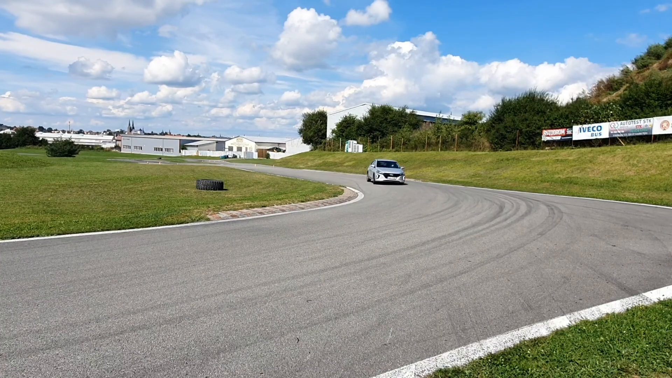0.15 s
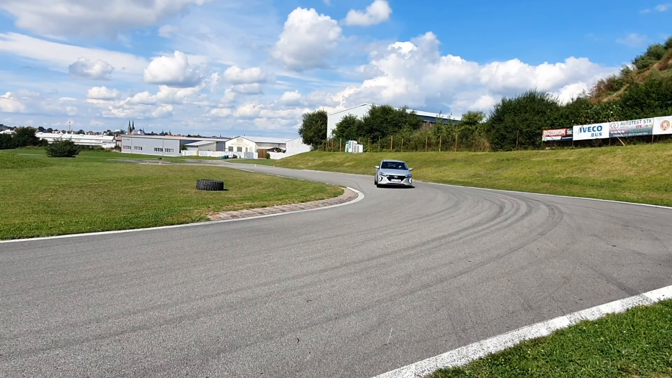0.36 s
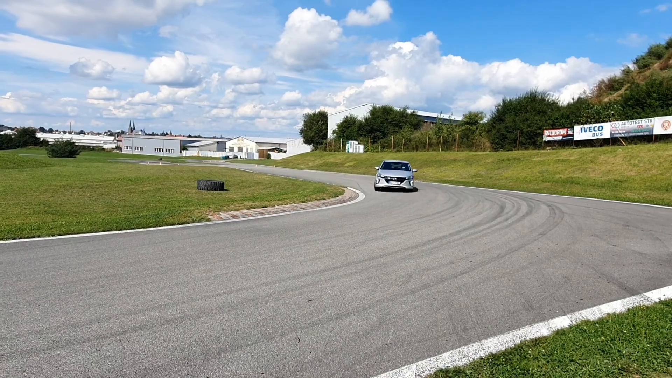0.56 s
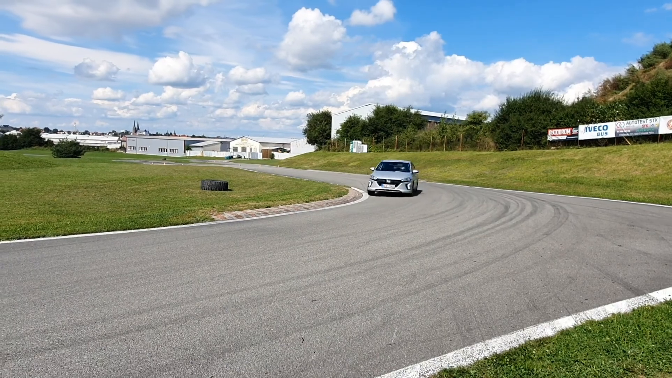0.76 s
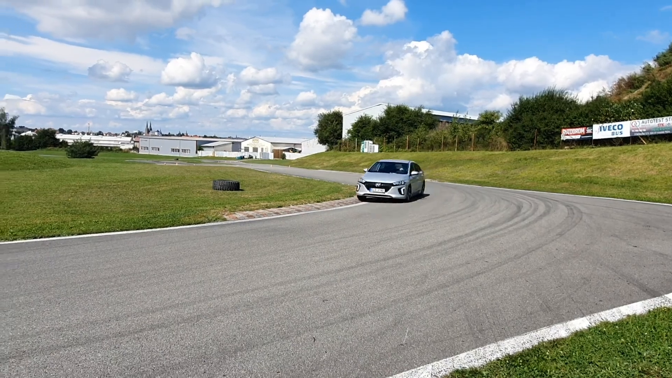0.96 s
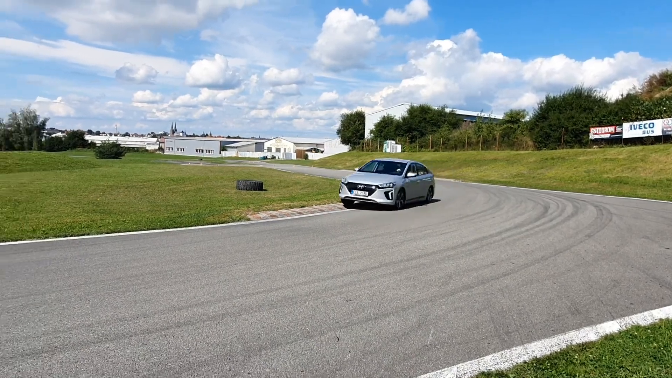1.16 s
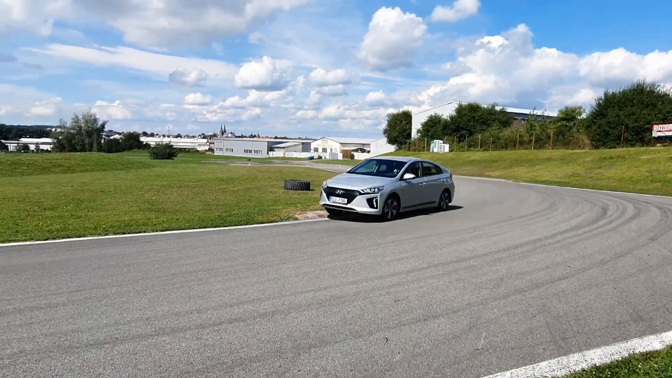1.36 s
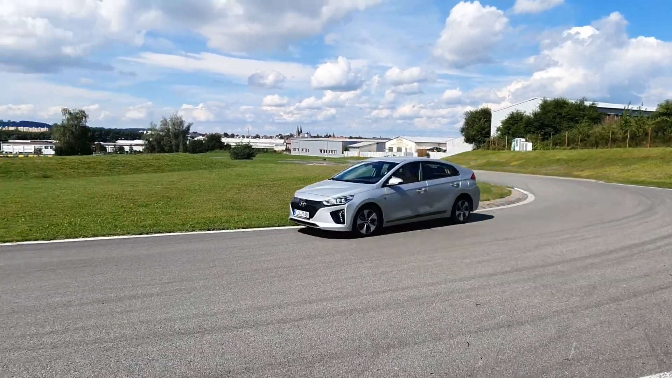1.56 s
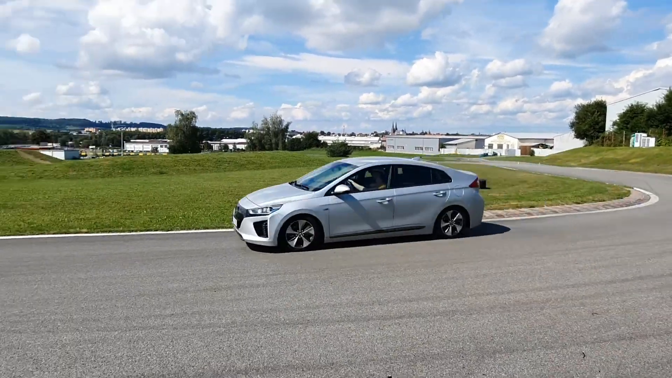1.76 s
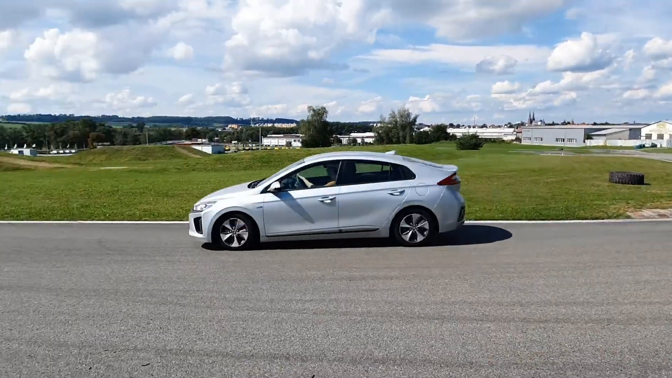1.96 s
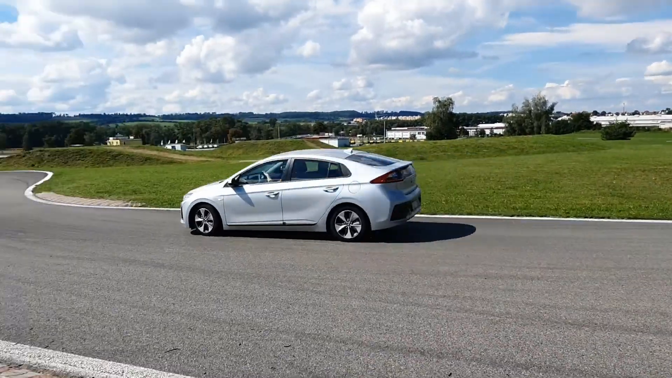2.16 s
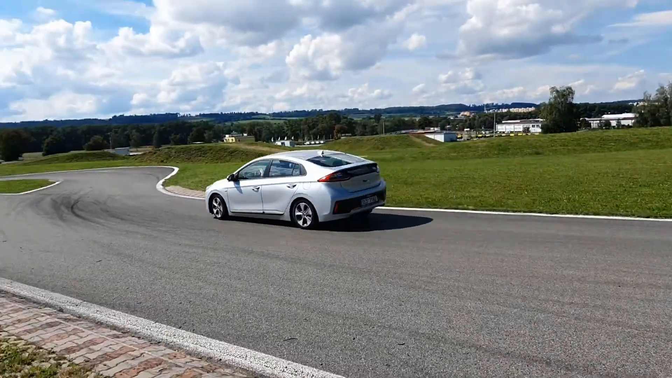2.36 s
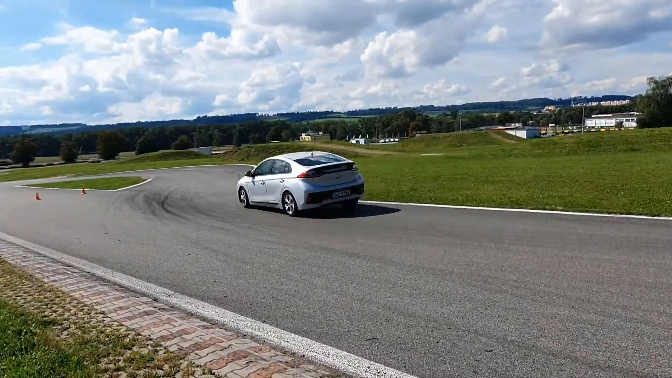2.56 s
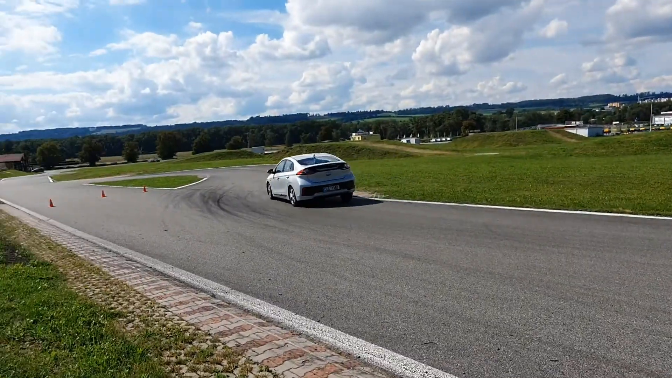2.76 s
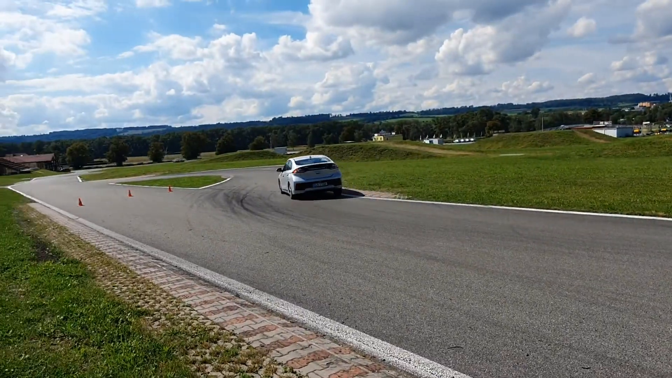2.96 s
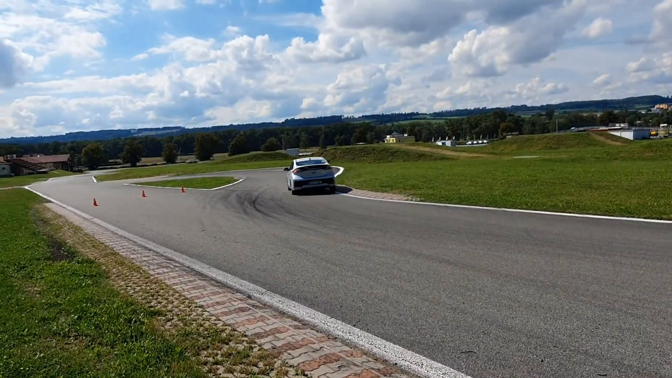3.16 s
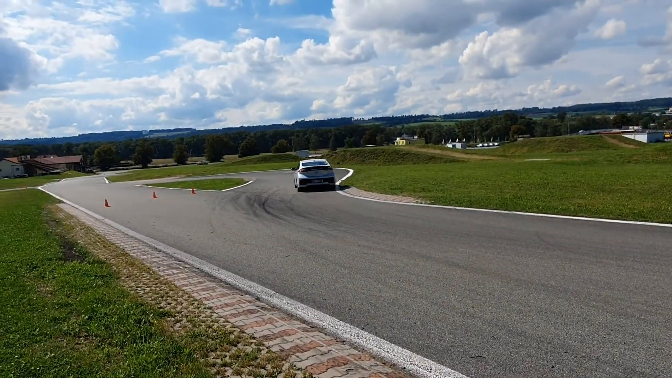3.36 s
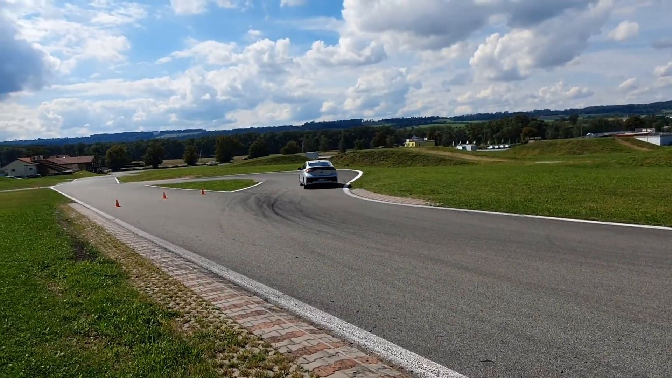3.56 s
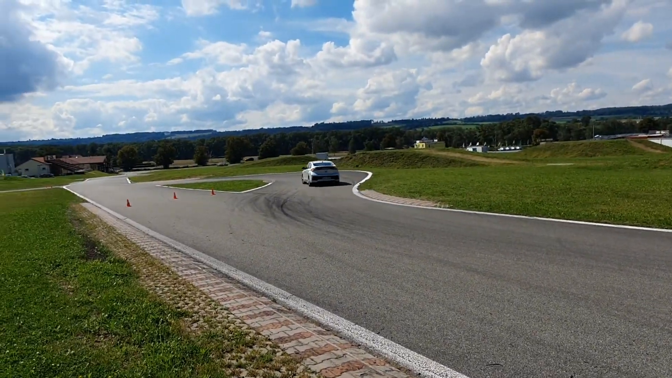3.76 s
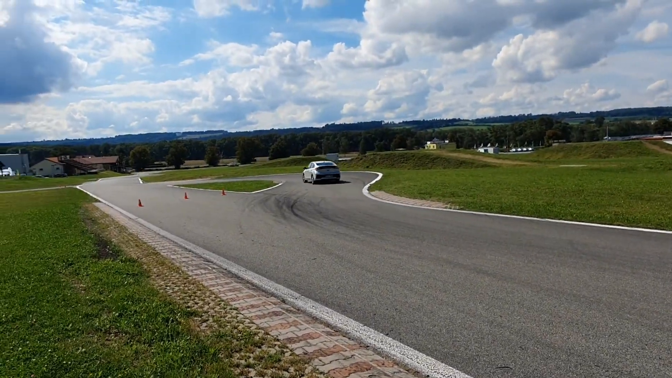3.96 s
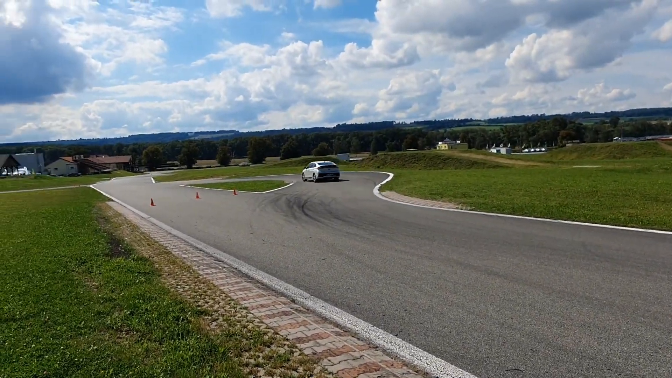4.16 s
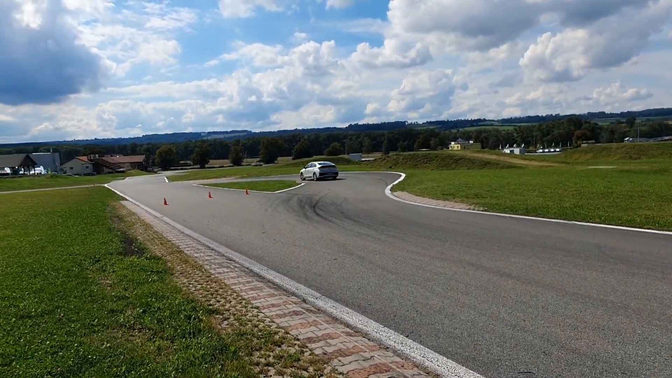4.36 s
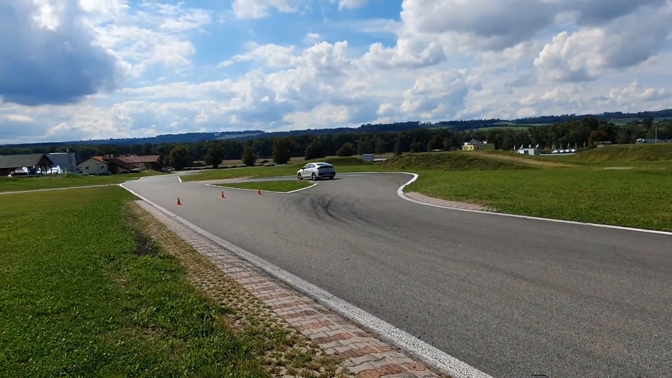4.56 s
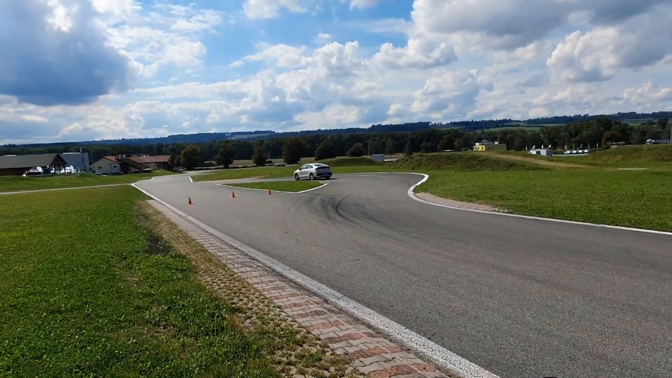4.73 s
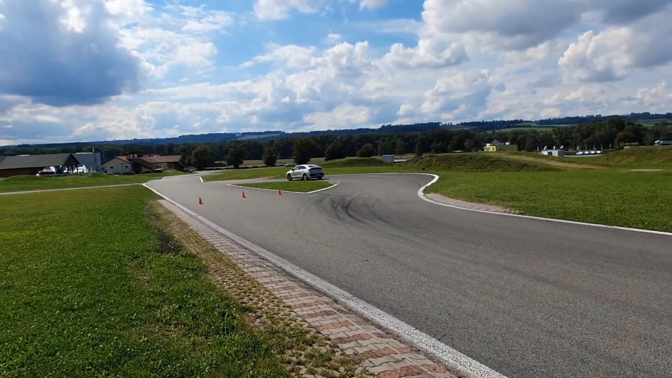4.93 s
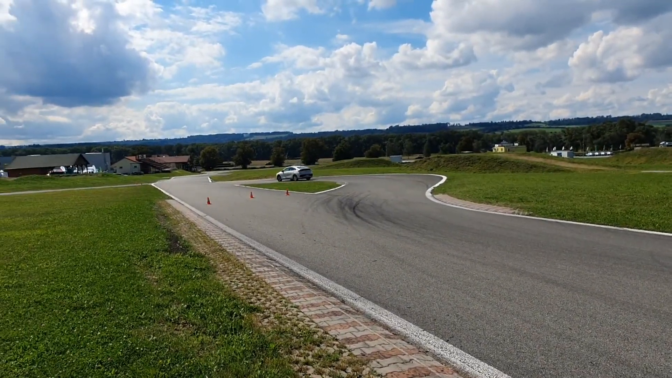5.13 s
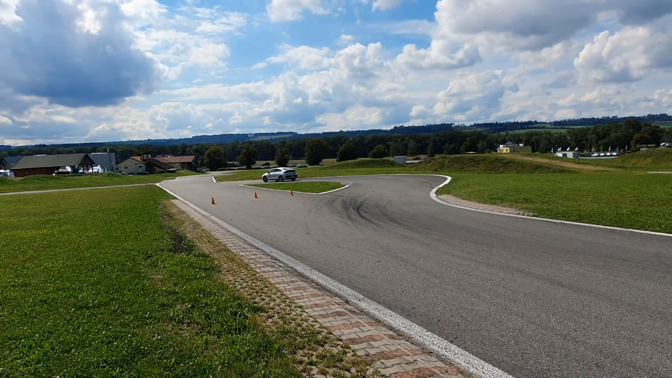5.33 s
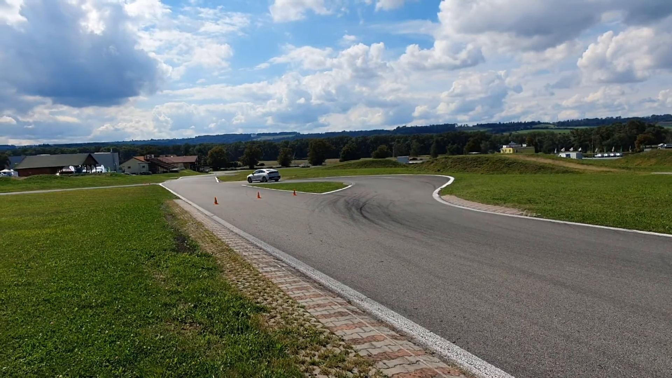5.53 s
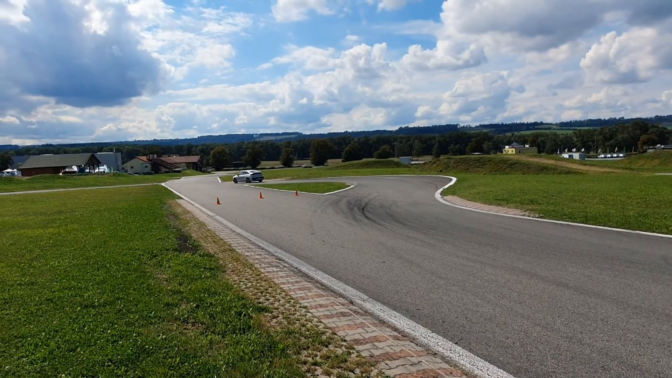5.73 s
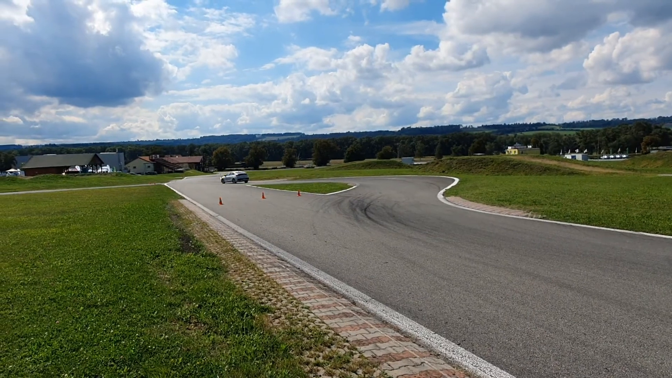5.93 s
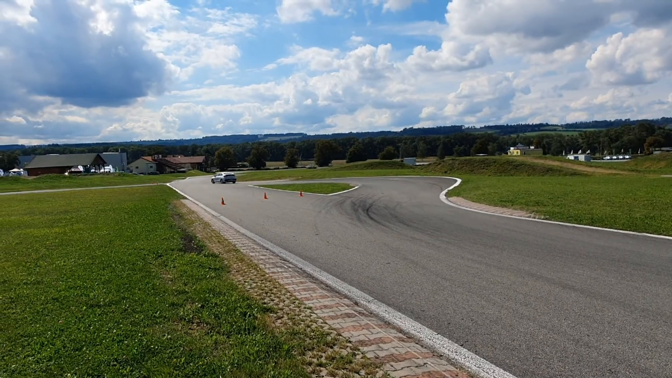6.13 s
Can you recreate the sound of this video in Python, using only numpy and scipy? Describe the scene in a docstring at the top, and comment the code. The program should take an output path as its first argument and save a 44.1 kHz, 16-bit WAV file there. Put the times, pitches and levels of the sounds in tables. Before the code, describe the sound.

Tyre squeal wavers, rises and peaks as a car sweeps by outdoors, then sinks away over tyre rush, low rumble and wind buffets.

```python
"""Outdoor circuit: a car corners hard, sweeps past a handheld stereo microphone, drives off into two far bends.
One tyre sings in stick-slip on a gliding pitch; the others scrub in broad noisy bands and chirp briefly.
Rolling rush is banded noise, dulled with distance; filtered noise gives the low outdoor rumble.
Gusts of low noise buffet the two ports; a limiter holds the peaks over faint preamplifier hiss."""
import sys
import numpy as np
from scipy import signal
from scipy.fft import rfft, irfft, next_fast_len
from scipy.io import wavfile
from scipy.ndimage import uniform_filter1d, minimum_filter1d, map_coordinates

SR = 44100
rng = np.random.default_rng(int(sys.argv[2]) if len(sys.argv) > 2 else 0)


def put_to_file(sound):
    """Save the sound as 16-bit audio at rate SR, in the file named by the first command-line argument."""
    columns = np.atleast_2d(sound).T  # one column per channel
    safe = np.clip(columns, -1, 1)
    whole_steps = np.round(safe * 32767)
    wavfile.write(sys.argv[1], SR, whole_steps.astype(np.int16))


def gain_from_db(level_db):
    """Turn a decibel level (scalar or array-like) into a linear amplitude factor."""
    decades = np.asarray(level_db, float) / 20
    return 10 ** decades


N = 277389

# singing tyre: time_s, slip_pitch_hz, fundamental_db, octave_re_fundamental_db
SQUEAL = [(0, 735, -29.5, -15), (.25, 783, -28, -15), (.6, 870, -38, -11), (.85, 920, -39, -10),
          (.94, 960, -26, -24), (1.03, 1010, -28, -20), (1.08, 1090, -42, -8), (1.14, 1270, -26, -18),
          (1.22, 1060, -27, -15), (1.3, 912, -30, -16), (1.35, 870, -19.5, -14), (1.41, 855, -18.5, -6),
          (1.455, 848, -16, -1), (1.505, 824, -13, -18), (1.56, 814, -22.5, -18), (1.62, 825, -22, -20),
          (1.68, 803, -20.5, -20), (1.74, 843, -22.5, -26), (1.8, 812, -21, -30), (1.89, 752, -20, -13),
          (1.97, 752, -20, -14), (2.05, 728, -22.5, -8), (2.14, 724, -25, -14), (2.25, 700, -25.5, -8),
          (2.4, 688, -33, 2), (2.52, 700, -30, -3), (2.74, 725, -33, -22), (2.82, 770, -34.5, -18),
          (2.95, 792, -39, -22), (3.1, 792, -52, -18)]
# tyre that grips and lets go: start_s, length_s, start_pitch_hz, tone_db, scuff_db
CHIRPS = [(0, .13, 862, -25, -50), (1.222, .035, 1160, -32.5, -23), (1.298, .024, 1300, -17, -24),
          (1.335, .045, 1330, -29.5, -19), (1.518, .047, 1287, -8.5, -15), (4.19, .05, 1256, -34, -58),
          (4.509, .04, 1235, -33.5, -60.5), (4.59, .022, 915, -29, -44.5), (4.703, .05, 1270, -32, -56.5),
          (4.86, .066, 1143, -44, -56), (5.15, .03, 1200, -52, -45)]
# chirp partials 2, 3, 4 before path dulling: level_re_fundamental_db
CHIRP_OVERTONES_DB = [-17, -17, -23]
# the car as heard: time_s, rolling_rush_db, sliding_db, treble_kept_over_path_db
CAR = [(0, -25.5, -39, -20), (.4, -28.5, -37, -16), (.68, -29, -35, -15), (.95, -29, -32, -7),
       (1.2, -20, -27, -7), (1.34, -19.5, -28, -7), (1.42, -26, -29, -1), (1.5, -26, -31, 3),
       (1.64, -32.5, -35, 2), (1.85, -28.5, -33, 2), (2.08, -30, -30, 2), (2.38, -26.5, -30, 0),
       (2.6, -31, -33, 2), (2.82, -35.5, -37, 3), (3.05, -40.5, -41, 3), (3.45, -42.5, -48.5, -6),
       (3.95, -37, -36.5, -6), (4.15, -38.5, -35, -8), (4.28, -39, -39, -7), (4.42, -41.5, -43, -13),
       (4.68, -41, -43.5, -15), (5.05, -45, -49.5, -13), (5.45, -50, -52, -12), (5.8, -46, -52, -13),
       (6.1, -40.5, -46, -21), (6.29, -42, -48, -17)]
# rolling rush spectrum, relative: frequency_hz, density_db_per_hz
RUSH_SPECTRUM = [(150, -5.5), (400, -12.5), (700, -2), (1200, -5.5), (2000, -3.5), (3000, -6.5),
                 (5000, -14.5), (9000, -8), (16000, -22.5)]
# outdoor rumble spectrum, relative: frequency_hz, density_db_per_hz
RUMBLE_SPECTRUM = [(20, -10.5), (40, 3.5), (160, 2), (250, 2.5), (400, -6.5), (800, -7.5), (2000, -28.5),
                   (6000, -43.5)]
# gusts on the ports: peak_time_s, peak_db, left_over_right_db, rise_and_fall_s_per_10_db
GUSTS = [(.17, -33.5, 8, .06), (.42, -37.5, 15, .15), (.81, -35.5, 2.5, .07), (1.08, -36, 4, .15),
         (1.26, -23, 6, .06), (1.35, -28, 4, .06), (1.46, -33, 2, .03), (1.74, -33, 13, .04),
         (1.91, -37, 14, .08), (2.03, -28.5, 3, .07), (2.3, -44, 2, .15), (2.8, -46, 7, .15),
         (3.4, -52, 10, .08), (4.03, -46, 4, .12), (4.3, -60, 4, .2), (5.04, -38, 13, .04),
         (5.35, -48, 1, .15)]
# microphone ports in their housing: frequency_hz, response_db, left_over_right_db, left_lead_rad, likeness_0_to_1
PORTS = [(60.5, -3, 0.5, -1, 1), (298, -1.5, -1.5, 0.36, 0.98), (507, -1.5, 4, 0.71, 0.95),
         (750, 0, 0, 0.08, .99), (960, 0, -3.5, 1.45, 0.71), (1037, 2, 11, 1.43, .95),
         (1300, 2.5, 0.5, 1.2, 0.87), (1570, 0, 8.5, 1.5, 0.8), (1750, 2, 9.5, 1.53, 0.4),
         (1900, 1, 5.5, 1.5, 0.3), (2320, -3.5, 11.5, -1, 0.8), (2568, 1.5, 2, 1.05, .95),
         (2970, -5, 2.5, 3.5, 0.8), (3130, -6.5, 6, 4, 0.78), (3680, -7.5, 5, 4.5, 0.9),
         (3875, -6.5, 2.5, 5.5, 0.5), (4474, -12.5, 8.5, 9.5, 0.3), (5280, -12.5, 4.5, 12.5, 0.5),
         (6560, -23.5, 9, 15, 0.4), (7330, -38.5, 12, 16.7, .4), (8100, -50.5, -2.5, 20.7, .1),
         (9200, -43, 8.5, 22.5, .2), (10020, -36.5, 17.5, 28.7, .45), (12250, -15.5, 11.5, 37.5, .5),
         (15600, -22.5, 14.5, 47.5, .2)]
# microphone turning to follow the car: time_s, added_right_port_lag_ms
TURN = [(0, 0.013), (1.5, -0.008), (2.5, 0.015), (4, 0.004), (5.6, 0.05), (6.29, 0.046)]

TAIL_TURNS_S, TAIL_TURN_LENGTH_S = 1.75, .2  # rear wheels come into the open


def rms_one(x):
    """Scale to unit rms."""
    return x / np.sqrt(np.mean(np.abs(x) ** 2) + 1e-20)


def in_time(rows):
    """Columns of a curve table at every sample."""
    time_s, *columns = np.transpose(rows)
    return [np.interp(np.arange(N) / SR, time_s, column) for column in columns]


def while_on(rows):
    """One over the span of a table, fading out within 50 ms beyond its ends."""
    t = np.arange(N) / SR
    inside_s = np.minimum(t - rows[0][0], rows[-1][0] - t)
    return np.clip(1 + inside_s / .05, 0, 1)


def rise(at_s, length_s):
    """Ramp from nought to one, centred on a moment."""
    return np.clip((np.arange(N) / SR - at_s) / length_s + .5, 0, 1)


def between(start_s, end_s, edge_s):
    """One between two moments, with ramped edges."""
    return rise(start_s, edge_s) - rise(end_s, edge_s)


def drift(rate_hz, size=N):
    """Smooth chance of spread 1 that changes about rate_hz times a second."""
    pole = np.exp(-2 * np.pi * rate_hz / SR)
    white = rng.standard_normal(size + SR)
    slow = signal.lfilter([1], [1, -2 * pole, pole * pole], white)[SR:]  # start-up dropped
    return rms_one(slow - slow.mean())


def coloured(spectrum):
    """Frequencies, and the spectrum of white noise weighted by a frequency_hz, density_db_per_hz table."""
    hz = np.maximum(np.arange(N // 2 + 1) * SR / N, 1)
    at_hz, level_db = np.transpose(spectrum)
    weight = gain_from_db(np.interp(np.log(hz), np.log(at_hz), level_db))
    return hz, rfft(rng.standard_normal(N)) * weight


def slip(pitch_hz, rough, width_hz, wobble, overtones):
    """Stick-slip: many tread blocks, partly in step, partly not; overtones follow their swing and phase."""
    size = len(pitch_hz)
    rough = np.clip(rough, 0, 1)
    stray = (drift(width_hz, size) + 1j * drift(width_hz, size)) / np.sqrt(2)
    wobbled_hz = pitch_hz * (1 + wobble * drift(18.08, size))
    carrier = np.exp(2j * np.pi * np.cumsum(wobbled_hz) / SR)
    swing = (np.sqrt(1 - rough) + np.sqrt(rough) * stray) * carrier
    phase = swing / (np.abs(swing) + 1e-9)
    partials = 1 + sum(gain * phase ** (k + 1) for k, gain in enumerate(overtones))
    return np.sqrt(2) * np.real(swing * partials)


def squeal():
    """The most loaded tyre sings: gliding stick-slip pitch, octave of its own strength, faint third partial."""
    rough_low, rough_from_hz, rough_per_khz = .1, 860, 4.0
    losing_grip_s, losing_grip_length_s, losing_grip_rough = 2.0, .3, .25
    pitch_hz, level_db, octave_db = in_time(SQUEAL)
    # blocks fall out of step when they slip faster, and as the song dies away
    fast_rough = rough_per_khz * np.maximum(pitch_hz - rough_from_hz, 0) / 1e3
    late_rough = losing_grip_rough * rise(losing_grip_s, losing_grip_length_s)
    rough = np.clip(rough_low + fast_rough + late_rough, 0, .75)
    octave = gain_from_db(octave_db)
    tone = slip(pitch_hz, rough, 80, 0.01297, [octave, gain_from_db(-23) * octave])
    return gain_from_db(level_db) * while_on(SQUEAL) * tone


def chirps():
    """Brief slips: fast onset, sagging pitch and level, a scuff that dies sooner; overtones dull with the path."""
    pitch_sag = .04  # share lost per length
    dulling = .8  # overtone dB per dB of path treble
    scuff_rise = .25  # share of length
    scuff_band = signal.butter(1, [1800, 5500], "band", fs=SR, output="sos")
    scuff = rms_one(signal.sosfilt(scuff_band, rng.standard_normal(N)))
    treble_db = in_time(CAR)[2]
    out = np.zeros(N)
    for start_s, length_s, start_hz, tone_db, scuff_db in CHIRPS:
        at = max(round(start_s * SR), 0)
        u = np.arange(round(1.3 * length_s * SR)) / (length_s * SR)  # time in lengths
        span = slice(at, at + len(u))
        shape = np.minimum(u / .12, 1) * gain_from_db(-3 * u) * np.clip((1.5 - u) / .9, 0, 1)
        overtones = gain_from_db(dulling * treble_db[at] + np.array(CHIRP_OVERTONES_DB))
        tone = slip(start_hz * (1 - pitch_sag * u), .18, 120, .015, overtones)
        scuff_shape = shape * np.minimum(u / scuff_rise, 1)
        out[span] += shape * (gain_from_db(tone_db) * tone + scuff_shape * gain_from_db(scuff_db) * scuff[span])
    return out


def scrub():
    """Tread sliding out of step: broad fluttering bands, each with an octave; lowest from the rear wheels."""
    rush_db, slide_db, _ = in_time(CAR)
    edge_s = .1
    lift_hz = 115 * between(1.7, 2.68, edge_s)  # higher while the car sweeps by
    flank_db = -7 * between(1.55, 3.1, edge_s)  # top band sinks while the flank faces the microphone
    rear_open = rise(TAIL_TURNS_S, TAIL_TURN_LENGTH_S)
    # centre_hz, width_hz, level_re_control_db, octave_db, control_gain
    bands = [(715 + .65 * lift_hz, 150, 1.5, -16, gain_from_db(slide_db) * rear_open),
             (1255 + lift_hz, 105, 0, -11, gain_from_db(slide_db)),
             (np.full(N, 1718.0), 90, -9, -25, gain_from_db(rush_db + flank_db))]
    out = np.zeros(N)
    for centre_hz, width_hz, level_db, octave_db, control_gain in bands:
        flutter_db = 0.87 * drift(8.8)
        band = slip(centre_hz, 0.99, width_hz, .02, [gain_from_db(octave_db)])
        out += control_gain * gain_from_db(level_db + flutter_db) * band
    return out


def rolling():
    """Overlapping half-octave bands of rush: air and bearing take the treble, and each band flickers."""
    middle_open_db, middle_shade_db = 4.5, -7.5  # middle treble is shaded until the tail turns
    middle_follows = .27  # share of the path loss
    rush_db, _, treble_db = in_time(CAR)
    shaded = 1 - rise(TAIL_TURNS_S, TAIL_TURN_LENGTH_S)
    middle_db = middle_open_db + middle_shade_db * shaded + middle_follows * treble_db
    hz, spectrum = coloured(RUSH_SPECTRUM)
    common_flicker = drift(21)
    out = np.zeros(N)
    for centre_hz in 100 * 2 ** np.arange(0, 8, .5):
        window = np.clip(1 - 2 * np.abs(np.log2(hz / centre_hz)), 0, 1)
        band = irfft(spectrum * window, N)
        middle = np.interp(np.log(centre_hz), np.log([2400, 5500, 12500]), [0, 1, 0])
        top = np.interp(np.log(centre_hz), np.log([5500, 12500]), [0, 1])
        flicker_db = (.5 + .4 * top) * common_flicker + 1.3 * drift(32)
        out += band * gain_from_db(middle_db * middle + treble_db * top + flicker_db)
    return gain_from_db(rush_db) * out / np.std(irfft(spectrum, N))


def rumble():
    """Low outdoor noise that follows a small share of the swing of the car's rush and treble levels."""
    mean_db, follows = -39.2, .18
    rush_db, _, treble_db = in_time(CAR)
    near_db = rush_db + treble_db
    noise = rms_one(irfft(coloured(RUMBLE_SPECTRUM)[1], N))
    return noise * gain_from_db(mean_db + follows * (near_db - near_db.mean()))


def wind():
    """Gusts of lumpy low noise, mostly unrelated in the two ports."""
    t, power = np.arange(N) / SR, np.zeros((2, N))
    for peak_s, peak_db, pan_db, fade_s in GUSTS:
        sides_db = pan_db * np.array([[.5], [-.5]])
        power += gain_from_db(peak_db - 10 * np.abs(t - peak_s) / fade_s + sides_db) ** 2
    band = np.vstack([signal.butter(2, [34, 100], "band", fs=SR, output="sos"),
                      signal.butter(2, 26, "high", fs=SR, output="sos")])

    def lumpy():
        """Band noise with a drifting level."""
        return rms_one(signal.sosfilt(band, rng.standard_normal(N))) * gain_from_db(drift(4.6))

    left, right = lumpy(), lumpy()
    return np.sqrt(power) * [left, rms_one(right + 0.36 * left)]


def ports(tones, noise, other_noise):
    """Housing response, port level and phase differences; part of the right noise comes from other directions."""
    run_in = 4096  # samples that let the port filters settle
    size = next_fast_len(N + SR)
    hz = np.arange(size // 2 + 1) * SR / size
    at_hz, *columns = np.transpose(PORTS)
    response_db, lean_db, lead_rad, alike = [np.interp(hz, at_hz, column) for column in columns]
    alike = np.clip(alike, 0, 1)
    padded = np.pad([tones, noise, other_noise], [(0, 0), (run_in, 0)], "reflect", reflect_type="odd")
    tones, noise, other_noise = rfft(padded, size) * gain_from_db(response_db)
    right_noise = alike * noise + np.sqrt(1 - alike ** 2) * other_noise
    left = irfft((tones + noise) * gain_from_db(lean_db / 2), size)
    right = irfft((tones + right_noise) * np.exp(-1j * lead_rad) * gain_from_db(-lean_db / 2), size)
    lag_ms = in_time(TURN)[0]
    reading = run_in + np.arange(N) - lag_ms * SR / 1000
    return np.array([left[run_in:run_in + N], map_coordinates(right, [reading], order=5, mode="nearest")])


def scene():
    """Tyres and background through the ports, wind on top."""
    tones = squeal() + chirps()
    noise, other_noise = [scrub() + rolling() + rumble() for _ in range(2)]
    return ports(tones, noise, other_noise) + wind()


def band_limit(x):
    """A steep low-pass at the top of the band."""
    return signal.sosfilt(signal.butter(12, 15670, fs=SR, output="sos"), x)


def record(dry):
    """A look-ahead limiter holds the peaks of each channel; faint preamplifier hiss is added."""
    ceiling_db, hiss_db = -.8, -102
    span = SR // 100
    room = np.minimum(1, gain_from_db(ceiling_db) / (np.abs(dry) + 1e-9))
    gain = uniform_filter1d(minimum_filter1d(room, size=2 * span), size=span)
    hiss = gain_from_db(hiss_db) * rng.standard_normal(dry.shape)
    return band_limit(gain * dry + hiss)


dry = scene()
out = record(dry)
put_to_file(out)
```